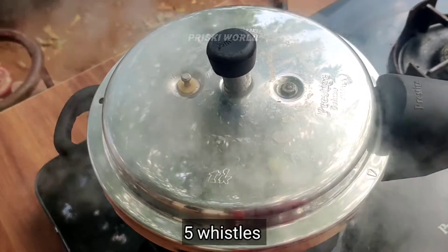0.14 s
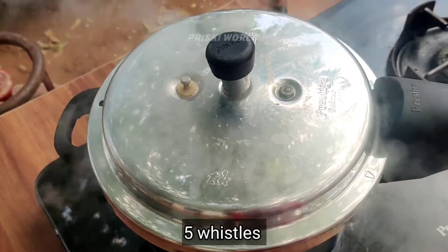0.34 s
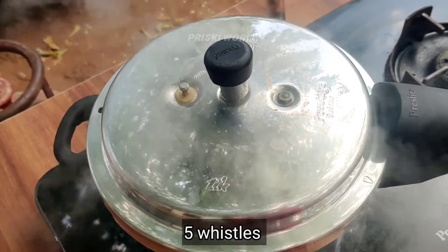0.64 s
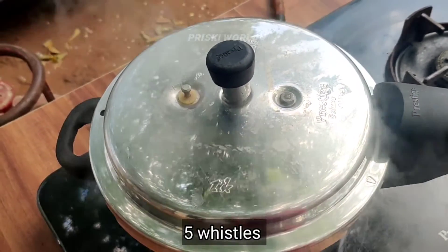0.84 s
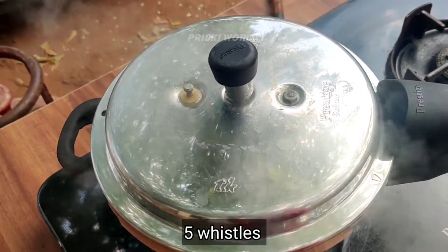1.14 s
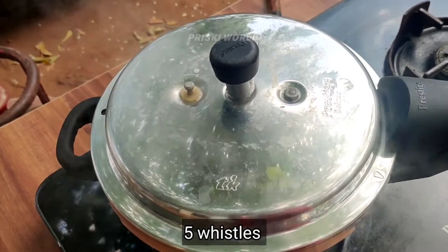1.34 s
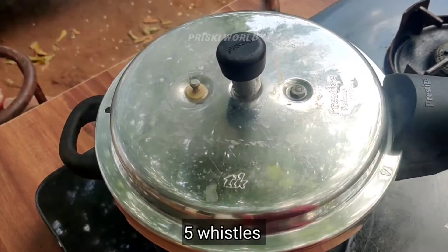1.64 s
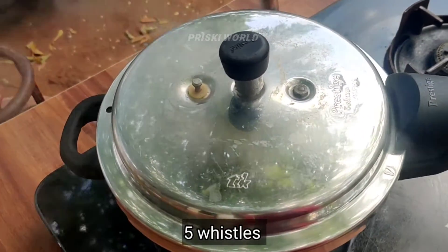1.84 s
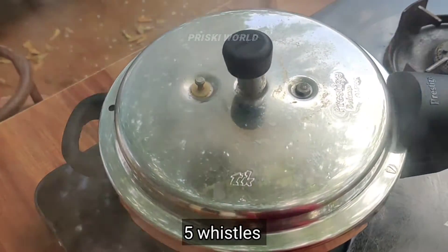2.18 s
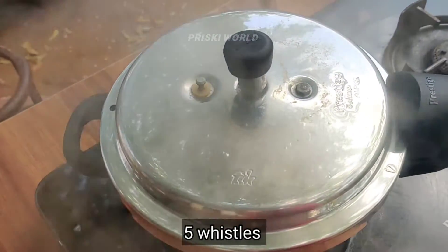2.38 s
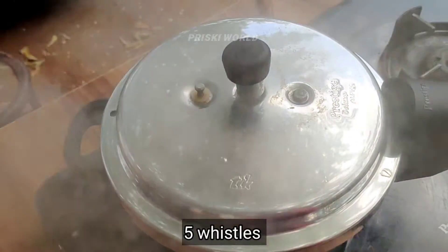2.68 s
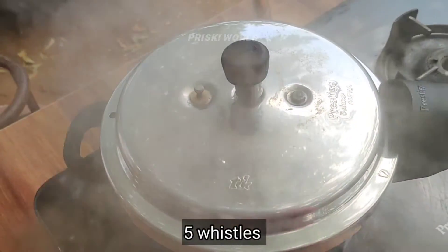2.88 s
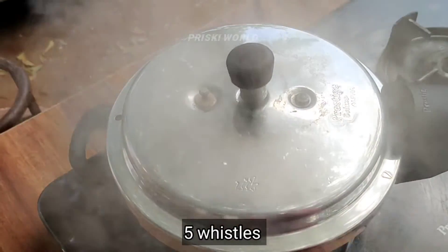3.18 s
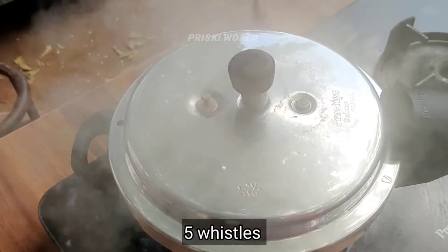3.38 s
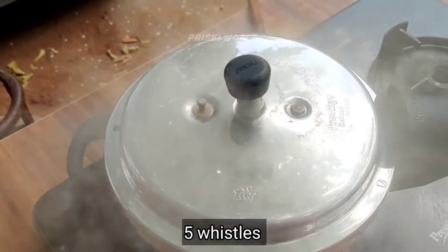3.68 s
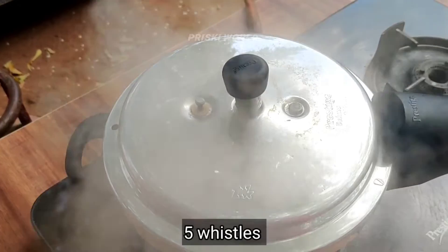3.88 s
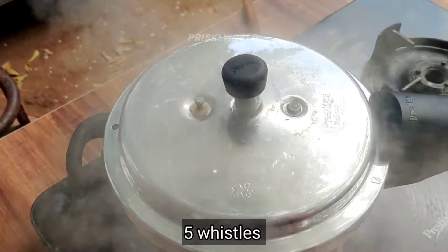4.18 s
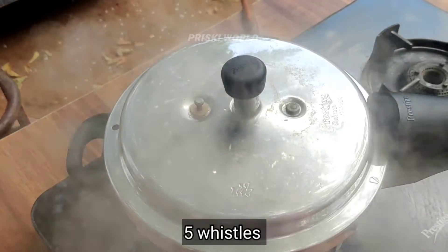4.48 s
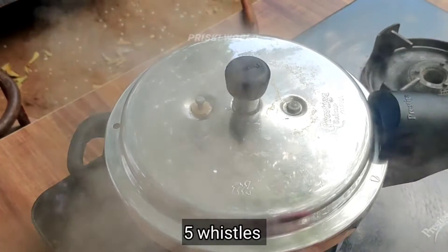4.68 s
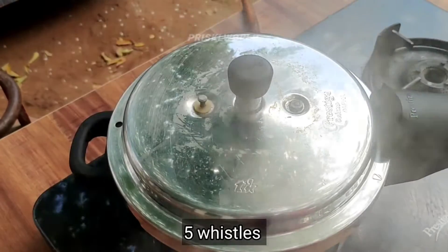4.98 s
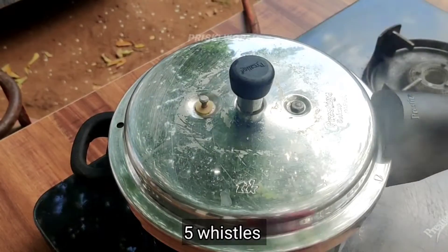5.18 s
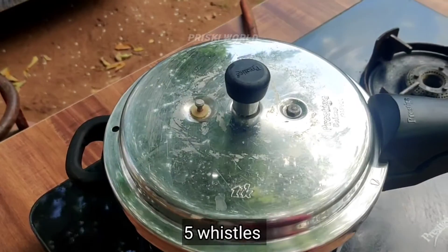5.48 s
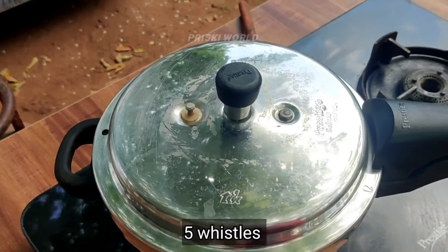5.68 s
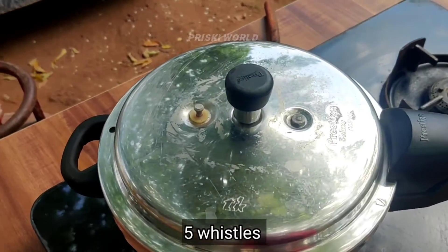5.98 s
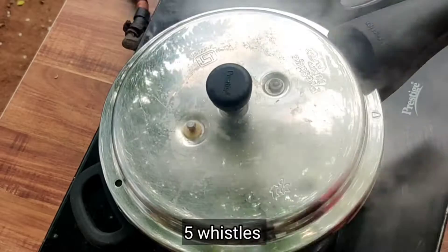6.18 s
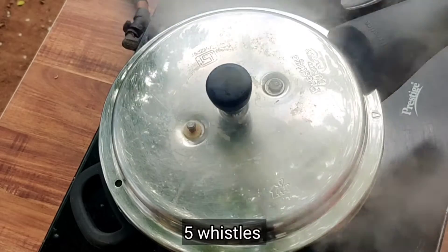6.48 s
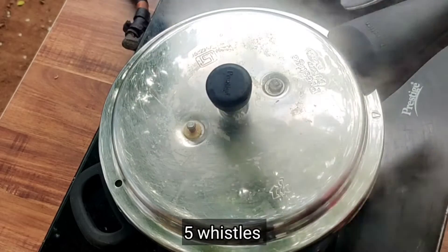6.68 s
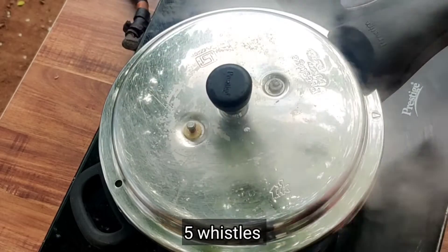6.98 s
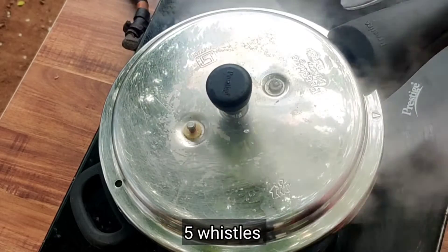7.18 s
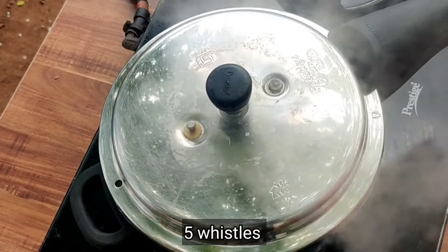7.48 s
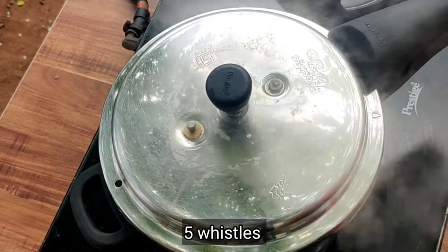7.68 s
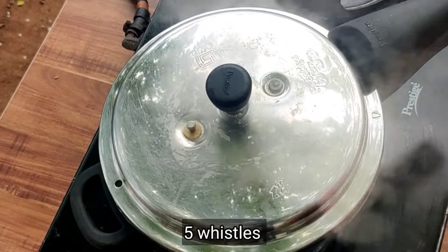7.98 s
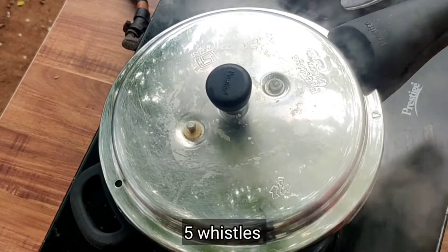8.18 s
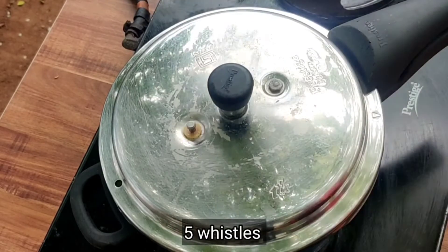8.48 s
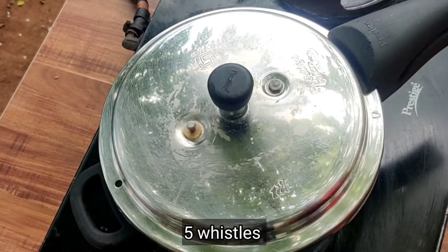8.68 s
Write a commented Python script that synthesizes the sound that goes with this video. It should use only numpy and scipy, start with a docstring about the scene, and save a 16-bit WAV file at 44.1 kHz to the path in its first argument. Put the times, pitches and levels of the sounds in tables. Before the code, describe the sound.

Close stereo pickup at a pressure cooker lid. A loud, harsh steam jet with a steady piercing whistle runs from the start, dull crackling puffs buffeting the microphone. It cuts off abruptly; the wet valve squeaks, chirps and spits quietly. After a tiny silence, a second, airier jet hisses, stops suddenly, and the weight gives a short buzz over faint leaking steam.

```python
"""At the lid of a pressure cooker, close to two microphone ports: steam is let off twice.
Each jet is drifting coloured noise with a whistling resonance near 5 kHz; dull crackles of steam buffet the ports.
As the weight drops back, the wet seat squeaks and spits after the first release and buzzes after the second.
Gliding sines make the squeaks, a few wavering partials the buzz; filtered noise makes leak, draught and background.
Between the two releases the sound fades briefly to silence."""
import sys
import numpy as np
from scipy import signal
from scipy.fft import rfft, irfft
from scipy.io import wavfile
from scipy.ndimage import uniform_filter1d

SR = 44100
rng = np.random.default_rng(int(sys.argv[2]) if len(sys.argv) > 2 else 0)


def unload_wav(signal):
    """Save mono or channel-first audio to the path in sys.argv[1] as 16-bit WAV at rate SR, clipped to [-1, 1]."""
    wavfile.write(
        sys.argv[1],
        SR,
        np.round(np.clip(np.atleast_2d(signal).T, -1, 1) * 32767).astype(np.int16),
    )


N = 389844
TIME = np.arange(N) / SR  # seconds

# quiet background colour: (frequency [Hz], relative density [dB per Hz])
BACKGROUND_COLOUR = [(20, -62), (60, -69), (110, -70.5), (175, -73), (240, -83), (500, -83.5),
                     (1100, -88.5), (1700, -87.5), (2200, -83), (4000, -100), (9000, -102), (15500, -104)]
# low hums behind the first and the second release: (frequency [Hz], level [dB])
FIRST_HUM_TONES = [(171, -60)]
SECOND_HUM_TONES = [(37.7, -41), (134.6, -48)]
# low rumble of moving air: (frequency [Hz], relative level [dB])
RUMBLE_COLOUR = [(15, -4.5), (35, 0), (55, -6.5), (85, -4.5), (130, -11), (200, -12.5), (330, -26),
                 (600, -34.5), (1500, -33), (4000, -48)]

# hiss past the seat: (frequency [Hz], relative level [dB])
SEAT_HISS_COLOUR = [(300, -36), (1350, -33), (1800, -9), (2300, -3), (3400, 8), (4300, 0), (5000, 0.5),
                    (5900, 3), (7300, -2.5), (9000, -12), (12000, -16.5), (15500, -22)]
# reshaping of that hiss after the second release: (frequency [Hz], gain [dB])
LAST_HISS_COLOUR = [(1500, 3), (5000, 0), (9000, 5), (14000, -8)]
# spurts of steam past the seated weight: (start [s], length [s], relative level [dB])
STEAM_SPURTS = [(4.774, 0.033, -37), (4.986, 0.053, -34), (5.067, 0.046, -37), (5.129, .068, -36.5),
                (5.463, .065, -31.5), (5.944, .025, -44), (5.963, 0.052, -42), (6.083, .06, -39.5),
                (8.39, .04, -39)]
# water spat from the valve: (time [s], relative peak [dB])
WATER_SPITS = [(4.9911, -21), (5.9349, -18), (6.0816, -15)]
# squeaks and low gurgles of the wet seat:
# (start [s], length [s], start pitch [Hz], middle pitch [Hz], end pitch [Hz], relative level [dB])
SEAT_SQUEAKS = [(4.79, .02, 910, 785, 600, -42), (4.798, 0.094, 2840, 2770, 2820, -43),
                (4.826, 0.093, 548, 556, 520, -49.5), (4.83, 0.092, 820, 782, 680, -52.5),
                (4.894, 0.028, 2230, 2400, 2450, -42), (4.924, .016, 2500, 2340, 2520, -28.5),
                (4.939, 0.034, 2600, 2770, 2900, -29), (4.977, 0.057, 2705, 2590, 1990, -28.5),
                (5.02, .028, 3700, 3710, 3700, -32), (5.047, 0.025, 3100, 2480, 2450, -38),
                (5.084, 0.031, 4210, 3500, 1900, -32.5), (5.132, .045, 3700, 3650, 3870, -35),
                (5.239, 0.12, 1860, 1820, 1830, -42), (5.253, 0.075, 3700, 3680, 3680, -42.5),
                (5.265, .023, 2400, 2750, 3950, -37.5), (5.327, 0.048, 4020, 3170, 3380, -33.5),
                (5.33, .02, 1950, 2390, 2650, -34), (5.376, 0.016, 3830, 3690, 3200, -32),
                (5.403, 0.082, 2010, 1770, 1970, -42.5), (5.41, .09, 3750, 3450, 3370, -42),
                (5.417, .025, 2560, 2450, 2400, -38.5), (5.418, .025, 5200, 5200, 5150, -41),
                (5.476, .032, 2100, 2270, 2350, -34.5), (5.518, 0.031, 2420, 2664, 2500, -27.5),
                (5.536, 0.071, 2310, 1940, 1890, -36), (5.548, 0.069, 4350, 3760, 4140, -35.5),
                (5.633, .057, 3270, 3810, 2980, -38.5), (5.683, 0.055, 2980, 2443, 2410, -33.5),
                (5.766, .055, 2350, 2640, 2513, -40.5), (5.821, .013, 2480, 2380, 2280, -32.5),
                (5.934, .04, 4650, 4620, 4300, -44), (5.939, 0.032, 2060, 2550, 3230, -39),
                (5.966, .049, 430, 445, 460, -52), (5.997, .046, 3110, 2710, 2675, -34.5),
                (6.03, .027, 4150, 3500, 3150, -40), (6.047, 0.074, 2210, 2384, 1810, -35),
                (6.121, .032, 2320, 2570, 2570, -37)]
# partials of the chattering weight: (multiple of the buzz pitch [-], relative level [dB])
CHATTER_PARTIALS = [(6, -22), (7, -14), (8, -1.5), (9, -0.5), (10, 1.5), (11, -14), (12, -16)]
# breath around the buzz: (frequency [Hz], relative level [dB])
BUZZ_AIR_COLOUR = [(1500, -32), (2400, -21), (3000, -4), (3500, -2), (4000, -14), (6000, -28)]

# crackle of steam at the ports: (frequency [Hz], relative level [dB])
CRACKLE_COLOUR = [(20, -5), (45, 2), (120, 1), (300, 2.5), (1200, 1.5), (2400, -0.5), (3300, -3.5),
                  (4500, -20), (9000, -48)]
# reshaping of the crackle where the dying plume only brushes the ports: (frequency [Hz], gain [dB])
SOFT_CRACKLE_COLOUR = [(60, -11), (350, 5.0), (700, 0), (1300, -8.5), (3000, 0.5)]
# the side to which the plume of the first release leans: (time [s], left minus right [dB])
PLUME_LEAN = [(0.0, 3), (0.25, 5), (0.33, 0), (0.55, -14), (0.8, -7.5), (1.1, -1), (1.35, 2.5), (1.55, 15),
              (1.68, 3), (2.05, 4), (2.35, 4.5), (3.2, -1), (3.4, -5), (3.68, -7), (3.85, 1), (4.0, -8),
              (4.6, 0.5), (4.76, -5)]
# puffs of steam that hit the ports: (middle [s], length [s], relative level [dB], left minus right [dB])
STEAM_PUFFS = [(0.17, 0.16, -31, 14), (0.7, 0.054, -32, 12), (1.077, .14, -32, 8), (1.257, 0.03, -30.5, 16),
               (1.489, 0.047, -22.5, 23), (1.587, 0.018, -24, 22), (1.773, 0.051, -26.5, 12),
               (1.852, 0.025, -33, 17), (1.936, 0.045, -24, 22), (2.04, 0.08, -29, 2),
               (2.163, 0.029, -21, 25), (2.234, 0.027, -23, 12), (2.6, .1, -31.5, -1),
               (2.76, 0.048, -32, 14), (2.88, .09, -25.5, 18), (2.978, 0.054, -27.5, 18),
               (3.09, 0.099, -34, 6), (3.267, 0.048, -25, 19), (3.55, .08, -32.5, 10),
               (3.769, 0.032, -23.5, 19), (4.245, 0.031, -24.5, 6), (4.296, 0.024, -30, -1),
               (4.396, 0.037, -26.5, 3), (4.454, 0.036, -25, 6), (4.597, .035, -27.5, 17),
               (4.703, 0.03, -28, 14)]

# jet colour, early and late in the first release and in the second:
# (frequency [Hz], relative left density [dB per Hz], relative right density [dB per Hz])
FIRST_JET_EARLY = [(100.0, -75, -87), (1190, -73.5, -75), (2620, -64.5, -66.5), (3470, -58, -59.5),
                   (3880, -61.5, -53.5), (4140, -60, -59), (5710, -61.5, -47.5), (5980, -56.5, -59.5),
                   (6620, -62, -51), (8100, -55.5, -59.5), (9500, -59.5, -56), (10800, -57, -55.5),
                   (12700, -63, -57.5), (15500, -59.5, -63)]
FIRST_JET_LATE = [(100.0, -84, -70.5), (1200.0, -75.5, -73), (2550, -65, -69), (3390, -60.5, -61),
                  (4100, -57.5, -57), (4150.0, -62.5, -58.5), (5670, -58, -47), (6040, -58, -55),
                  (6770, -59, -52), (8100, -58, -60.5), (10300, -61.5, -56), (9900, -59, -51.5),
                  (13000.0, -62, -55.5), (15500, -61.5, -60)]
SECOND_JET = [(100.0, -72, -76), (570, -78.5, -82.5), (1300.0, -70.5, -73.5), (1730, -66, -68.1),
              (3150, -60, -61), (3940, -56, -61.5), (4300, -57.5, -62), (6300, -62.5, -56.5),
              (6800.0, -65, -57), (8100, -56, -62), (9100, -61.5, -58), (10800, -53.5, -57.5),
              (12800, -57.5, -57), (15400.0, -58.2, -57.5)]
# how the two ports hear each jet: (frequency [Hz], likeness [0-1], phase by which left leads [rad])
FIRST_JET_PORTS = [(1500, 0.1, 0), (3300, 0.4, -1), (3880, 0.15, -0.2), (4260, 0.92, -4), (5100, 0.35, -7),
                   (5710, 0.94, -10.5), (7070, 0.6, -13.5), (8750, 0.07, -12.5), (8900, 0.1, -11),
                   (11800, 0.53, -8), (14300, 0.7, -8)]
SECOND_JET_PORTS = [(60, .65, -1.5), (700, .4, 0.7), (1850, 0.82, -0.3), (3320, 0.74, -0.6),
                    (4100, 0.58, 1.7), (5020, 0.12, -4.9), (5740, 0.43, -1), (7200, 0.17, -2.5),
                    (9300, .1, -3), (10900, 0.22, -5.5), (14000, 0.55, -4.7)]

WHISTLE_HZ, WHISTLE_WIDTH_HZ = 4938, 370
EDGE_HZ = 15680  # upper band limit
# a jet runs at full strength until the weight drops back; the last steam then dies away
FIRST_SHUT_S, SECOND_SHUT_S = 4.788, 8.408
CLOSE_S, TAIL_DB_PER_S = 0.019, 183
# the sound fades out, stays silent and fades in on the second release
SILENT_FROM_S, SILENT_TO_S, FADE_OUT_S, FADE_IN_S = 6.176, 6.235, 0.052, 0.13
PUFF_STEEPNESS = 2.7  # how abruptly a puff arrives and leaves
# the dying plume of the second release drifts across the ports
DRIFT_START_S, DRIFT_RISE_S, DRIFT_SAG_DB_PER_S = 8.41, 0.1, 9
SPURT_RISE_S, SPURT_FALL_DB_PER_S = 0.027, 257
# seepage after each release, relative levels; the first dwindles as the seat wets and seals
FIRST_SEEP_DB, SECOND_SEEP_DB, SEEP_SAG_DB_PER_S = -44, -41.5, 7.5
# the weight chatters on its seat, growing louder until it settles
BUZZ_START_S, BUZZ_LENGTH_S, BUZZ_RISE_S, BUZZ_FALL_DB_PER_S = 8.495, 0.27, .04, 280
BUZZ_HZ, BUZZ_SWELL_DB_PER_S = 345, 16


def gain_of(db):
    """Decibels to amplitude."""
    return 10 ** (np.asarray(db) / 20)


def evened(x):
    """Scales to rms 1."""
    return x / np.sqrt(np.mean(x ** 2) + 1e-20)


def read(points, hz):
    """The columns of a table, joined on a log-frequency axis."""
    f, *columns = np.transpose(points)
    return np.array([np.interp(np.log(hz + 1), np.log(f + 1), column) for column in columns])


def panned(db):
    """Left and right gains of unit mean power, from left minus right in dB."""
    pair = gain_of(np.array([db, -db]).reshape(2, -1) / 2)
    return pair / np.sqrt(np.mean(pair ** 2, axis=0))


def add(mix, s, sound):
    """Mixes a stereo sound in at time s."""
    part = mix[:, round(s * SR):][:, :sound.shape[1]]
    part += sound[:, :part.shape[1]]


def wander(rate_hz):
    """Smooth random motion of rms 1, rolling off above the rate."""
    hz = np.fft.rfftfreq(N, 1 / SR)
    spectrum = rfft(rng.standard_normal(N)) / (1 + (hz / rate_hz) ** 4)
    return evened(irfft(spectrum, N))


def swept_sine(hz):
    """A sine that follows a pitch curve over the whole scene."""
    return np.sin(2 * np.pi * np.cumsum(hz) / SR)


def coloured(x, colour):
    """Filters by a (frequency, dB) table."""
    return irfft(rfft(x) * gain_of(read(colour, np.fft.rfftfreq(N, 1 / SR))), N)


def noise_pair(same):
    """White noise at two ports, sharing the given part of its power."""
    same = np.clip(same, 0, 1)
    shared = np.sqrt(same) * rng.standard_normal(N)
    return shared + np.sqrt(1 - same) * rng.standard_normal((2, N))


def envelope(start, length, rise_s, fall_db_per_s):
    """Linear attack, hold to the end of the length, exponential release."""
    t = TIME - start
    return np.clip(t / rise_s, 0, 1) * gain_of(-fall_db_per_s * np.maximum(t - length, 0))


def whistling(x, left_db, right_db, width_hz=WHISTLE_WIDTH_HZ, dip_db=0., dip_hz=4160, dip_width_hz=110):
    """A narrow resonance turns hiss into a whistle, strongest at the left port; a dip can lie below it."""
    hz = np.fft.rfftfreq(N, 1 / SR)
    bell = np.exp(-((hz - WHISTLE_HZ) / width_hz) ** 2 / 2)
    dip = np.exp(-((hz - dip_hz) / dip_width_hz) ** 2 / 2)
    return irfft(rfft(x) * gain_of(np.array([[left_db], [right_db]]) * bell + dip_db * dip), N)


def background():
    """Steady coloured noise, partly shared by the ports."""
    return coloured(noise_pair(0.61), BACKGROUND_COLOUR) * np.sqrt(SR / 2)  # density to amplitude


def hum(lines, waver=0.0299):
    """Faint low tones that waver in pitch."""
    tones = [gain_of(db) * swept_sine(hz * (1 + waver * wander(12))) for hz, db in lines]
    return np.sqrt(2) * sum(tones)


def drift():
    """Strength of the dying plume at the ports: it swells and slowly sags."""
    return envelope(DRIFT_START_S, DRIFT_RISE_S, DRIFT_RISE_S, DRIFT_SAG_DB_PER_S)


def draught(draught_db=-29.5, sag_db_per_s=5.0, drift_db=-25, lumpy_db=1.5):
    """Low rumble of moving air: it eases through the second release and returns with the drifting plume."""
    rumble = evened(coloured(noise_pair(0.43), RUMBLE_COLOUR) * gain_of(lumpy_db * wander(33)))
    easing = (TIME > SILENT_TO_S) * gain_of(draught_db - sag_db_per_s * (TIME - SILENT_TO_S))
    returning = gain_of(drift_db) * drift()
    return rumble * np.hypot(easing * panned(3.4), returning * panned(2.4))


def seepage():
    """Flow past the seated weight: a dwindling seep with spurts on top, added as powers."""
    seeping = (TIME > FIRST_SHUT_S) * (TIME < SILENT_FROM_S)
    seep = gain_of(FIRST_SEEP_DB - SEEP_SAG_DB_PER_S * (TIME - FIRST_SHUT_S)) * seeping
    spurts = [gain_of(db) * envelope(s, length, SPURT_RISE_S, SPURT_FALL_DB_PER_S)
              for s, length, db in STEAM_SPURTS]
    return np.sqrt(seep ** 2 + sum(spurt ** 2 for spurt in spurts))


def leak(leak_db=5.5, sputter_db=2.0, spit_db=-7, spit_decay_s=.006):
    """A sputtering hiss past the seat, with sudden spits of water; its colour shifts after the second release."""
    hiss = whistling(coloured(noise_pair(0.09), SEAT_HISS_COLOUR) * panned(-4.0), left_db=14.5, right_db=0.0)
    hiss = evened(hiss * gain_of(sputter_db * wander(150)))
    strength = gain_of(leak_db) * seepage()
    for s, db in WATER_SPITS:
        strength = strength + gain_of(db + spit_db) * (TIME >= s) * np.exp(-abs(TIME - s) / spit_decay_s)
    last = gain_of(SECOND_SEEP_DB) * (TIME > SECOND_SHUT_S)
    return hiss * strength + coloured(hiss, LAST_HISS_COLOUR) * last


def twitter(low_hz=2500, high_hz=3600, sweep=0.15, twitter_db=-4.0, flicker_db=5.5):
    """Smaller gaps in the water film whistle faintly at wandering pitches while steam seeps out."""
    tones = 0
    for hz in (low_hz, high_hz):
        pitch = hz * (1 + sweep * wander(30) + .03 * wander(396))
        tones = tones + swept_sine(pitch) * gain_of(flicker_db * wander(40))
    return gain_of(twitter_db) * evened(tones) * seepage() * (TIME < SILENT_FROM_S) * panned(-6)


def squeaks(jitter_hz=75, shimmer_db=2.5, squeak_db=1.0, overtone_db=-22, pan_db=-5):
    """Steam whistles through gaps in the water film; each gap glides in pitch as it opens and shuts."""
    out = np.zeros((2, N))
    waver_hz = jitter_hz * wander(340)
    shimmer = evened(gain_of(shimmer_db * wander(160)))
    for s, length, start, middle, end, db in SEAT_SQUEAKS:
        u = np.linspace(0, 1, max(round(length * SR), 8))
        at = round(s * SR) + np.arange(len(u))
        hz = np.polyval(np.polyfit([0, .5, 1], [start, middle, end], 2), u)  # an arch through the three pitches
        angle = 2 * np.pi * np.cumsum(hz + waver_hz[at]) / SR  # the same waver makes low notes gurgle
        tone = np.sin(angle) + gain_of(overtone_db) * np.sin(2 * angle)
        tone = evened(tone * signal.windows.tukey(len(u), .3))
        add(out, s, gain_of(db + squeak_db) * tone * shimmer[at] * panned(pan_db))
    return whistling(out, left_db=10, right_db=-6)


def buzz(jitter=0.008, shimmer_db=3.5, throb_db=2.5, buzz_db=-29, air_db=-9):
    """The weight chatters like a reed and rocks unevenly; only partials near the vent's resonance carry."""
    angle = 2 * np.pi * np.cumsum(BUZZ_HZ * (1 + jitter * wander(107))) / SR
    tone = 0
    for k, db in CHATTER_PARTIALS:
        partial = np.sin(round(k) * angle + 2 * np.pi * rng.random())
        tone = tone + gain_of(db + shimmer_db * wander(40)) * partial
    air = coloured(noise_pair(0.33), BUZZ_AIR_COLOUR)
    throb = evened(gain_of(throb_db * wander(110)))
    swell = gain_of(buzz_db + BUZZ_SWELL_DB_PER_S * np.clip(TIME - BUZZ_START_S, 0, BUZZ_LENGTH_S))
    strength = swell * envelope(BUZZ_START_S, BUZZ_LENGTH_S, BUZZ_RISE_S, BUZZ_FALL_DB_PER_S)
    return (evened(tone) + gain_of(air_db) * evened(air)) * throb * strength * panned(3.1)


def reflections(x, wet_db=-6, t60=0.17):
    """A short scatter from the lid and the table: sparse decaying echoes, different at each port."""
    t = np.arange(SR // 4) / SR
    sparse = rng.random((2, len(t))) < .05
    taps = rng.standard_normal((2, len(t))) * sparse * gain_of(-60 * t / t60)
    taps = taps / np.linalg.norm(taps, axis=1, keepdims=True)
    return gain_of(wet_db) * signal.fftconvolve(x.mean(0)[None], taps, axes=1)[:, :N]


def flow(shut_s, tail_db):
    """Strength of a jet: full until the weight cuts it off, then a dying remnant."""
    opening = np.clip((shut_s - TIME) / CLOSE_S, 0, 1)
    remnant = gain_of(tail_db - TAIL_DB_PER_S * np.maximum(TIME - shut_s, 0))
    return opening + (1 - opening) * remnant


def puffing(puff_db=0.67):
    """Power of all puffs at each port; a puff is at half power at the ends of its length."""
    t = np.arange(0, N / SR, .002)  # a coarse clock is enough
    power = 0
    for s, length, db, pan in STEAM_PUFFS:
        shape = .5 ** (abs(2 * (t - s) / length) ** PUFF_STEEPNESS)
        power = power + shape * (gain_of(db + puff_db) * panned(pan)) ** 2
    return np.array([np.interp(TIME, t, port) for port in power])


def gusts(pops_per_s=850, smooth=0.46, lumpy_db=2.0, plume_db=-32.5, drift_db=-33.0):
    """Eddies of steam hit each port on its own: a dense, dull crackle that swells with every puff."""
    pops = rng.standard_normal((2, N)) * (rng.random((2, N)) < pops_per_s / SR)
    lumps = gain_of(lumpy_db * np.array([wander(30), wander(27)]))
    crackle = (evened(pops) + smooth * noise_pair(0)) * lumps
    crackle = evened(coloured(crackle, CRACKLE_COLOUR))
    soft = coloured(crackle, SOFT_CRACKLE_COLOUR)
    lean_s, lean_db = np.transpose(PLUME_LEAN)
    plume = gain_of(plume_db) * panned(np.interp(TIME, lean_s, lean_db))
    strength = np.sqrt(plume ** 2 + puffing()) * flow(FIRST_SHUT_S, tail_db=-10)
    return crackle * strength + gain_of(drift_db) * soft * drift()


def smoothed_patches(shape, bins, frames):
    """Random patches of rms 1 over the last two axes, frequency and time."""
    smooth = uniform_filter1d(rng.standard_normal(shape), size=bins, axis=-2)
    return evened(uniform_filter1d(smooth, size=frames, axis=-1))


def jet(early, late, ports, patchy_db, ripple_db, flutter_db, turn_s=3.04, turn_length_s=1.0):
    """Turbulent hiss in drifting patches; its colour turns slowly from early to late."""
    hz, t, (a, b) = signal.stft(rng.standard_normal((2, N)), SR, nperseg=1024)
    same, lead = read(ports, hz)[:, :, None]
    same = np.clip(same, 0, 1)
    right = (same * a + np.sqrt(1 - same ** 2) * b) * np.exp(-1j * lead)
    z = np.array([a, right])
    turn = np.clip((t - turn_s) / turn_length_s + .5, 0, 1)
    colour_db = read(early, hz)[:, :, None] * (1 - turn) + read(late, hz)[:, :, None] * turn
    patches = smoothed_patches(z.shape, bins=24, frames=12)
    # fine random ripples in frequency make the hiss grainy, slowly changing
    ripples = smoothed_patches(z.shape[1:], bins=3, frames=16)
    z = z * gain_of(colour_db + patchy_db * patches + ripple_db * ripples)
    hiss = signal.istft(z, SR, nperseg=1024)[1][:, :N]
    flutter = gain_of(flutter_db * wander(190))  # the floating weight shakes the flow
    return hiss * np.sqrt(SR / 2) * flutter


def second_release(jet_db=-0.77, swell_db_per_s=0.13):
    """A shorter, airier release heard from another side."""
    hiss = jet(SECOND_JET, SECOND_JET, SECOND_JET_PORTS, patchy_db=0.83, ripple_db=2.0, flutter_db=0.27)
    swell = gain_of(jet_db + swell_db_per_s * (TIME - SILENT_TO_S))
    strength = swell * flow(SECOND_SHUT_S, tail_db=-13.5) * (TIME > SILENT_TO_S)
    return whistling(hiss, left_db=14.5, right_db=2.5, width_hz=310) * strength


def first_release(jet_db=-.2):
    """The long, whistling release."""
    hiss = jet(FIRST_JET_EARLY, FIRST_JET_LATE, FIRST_JET_PORTS, patchy_db=0.52, ripple_db=2.2, flutter_db=.7)
    whistle = whistling(hiss, left_db=18.5, right_db=-1.9, dip_db=-5)
    return whistle * gain_of(jet_db) * flow(FIRST_SHUT_S, tail_db=-17)


def scene(quiet_db=-2):
    """Both releases, the noises of the valve seat and the background, with the fade between them."""
    valve = squeaks() + twitter() + buzz()
    quiet = gain_of(quiet_db) * (valve + reflections(valve) + leak() + background())
    hums = np.where(TIME < SILENT_TO_S, hum(FIRST_HUM_TONES), hum(SECOND_HUM_TONES) * panned(5))
    fade_out = np.clip((SILENT_FROM_S - TIME) / FADE_OUT_S, 0, 1)
    fade_in = np.clip((TIME - SILENT_TO_S) / FADE_IN_S, 0, 1)
    return (hums + draught() + quiet + gusts() + second_release() + first_release()) * (fade_out + fade_in)


def record(dry):
    """The highest peaks are rounded off; then the band limit."""
    rounded = dry / (1 + (dry / .85) ** 8) ** (1 / 8)
    lowpass = signal.firwin(511, EDGE_HZ, window=("kaiser", 9), fs=SR)
    return signal.oaconvolve(rounded, lowpass[None], "same")


dry = scene()
out = record(dry)
unload_wav(out)
```